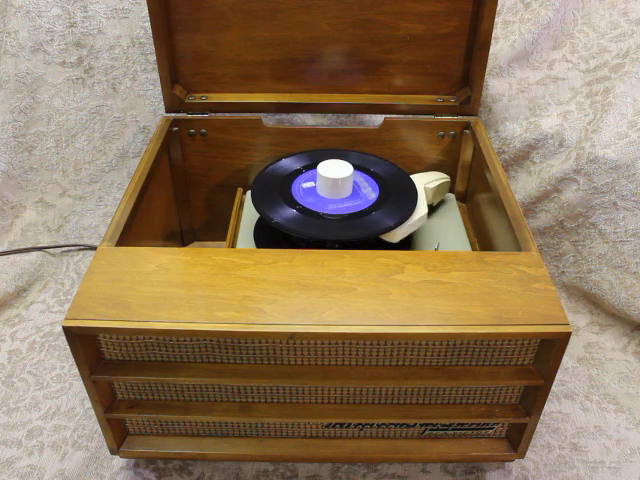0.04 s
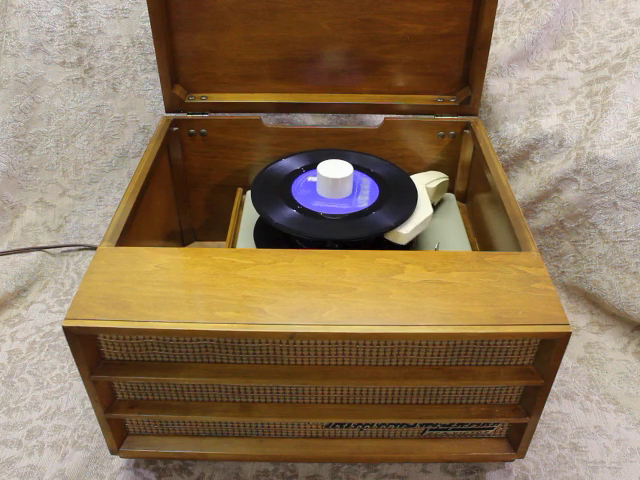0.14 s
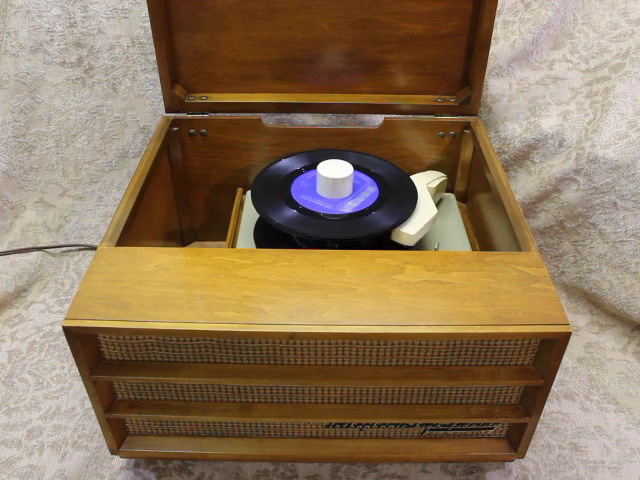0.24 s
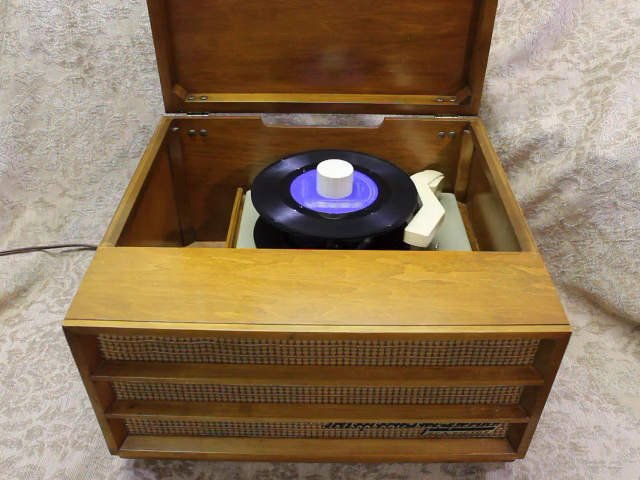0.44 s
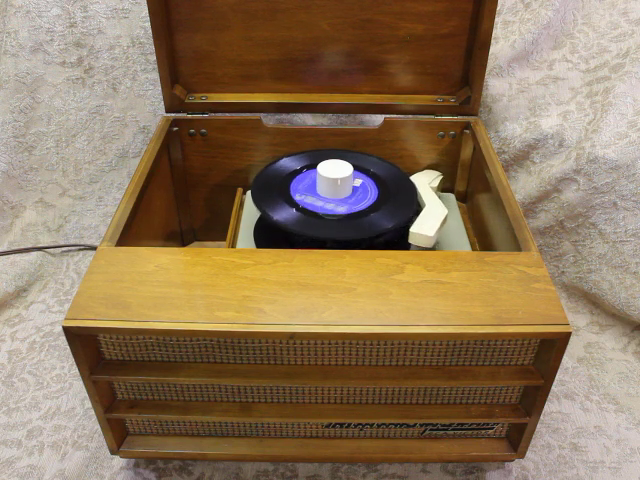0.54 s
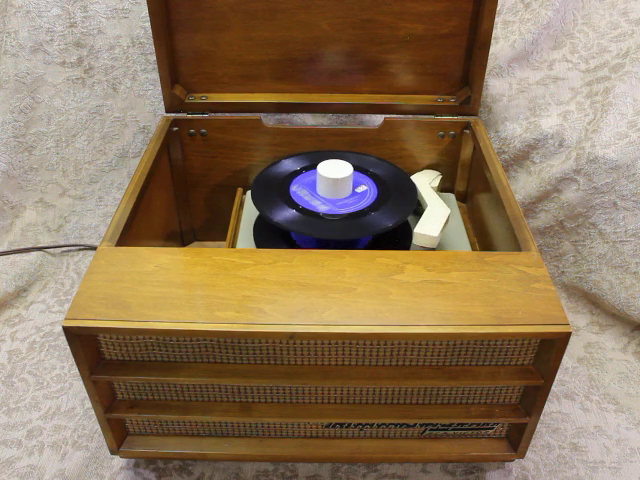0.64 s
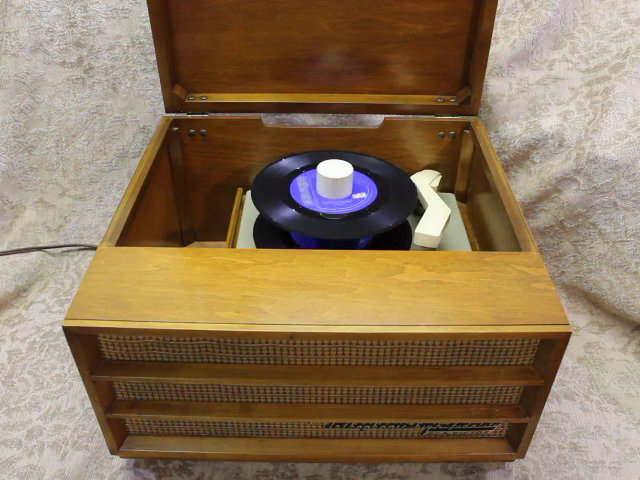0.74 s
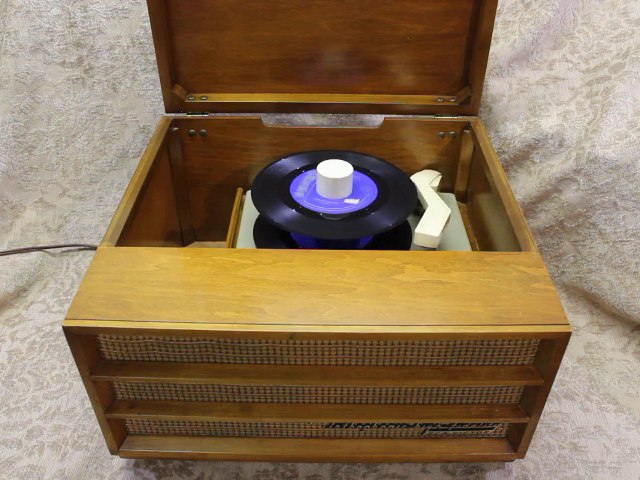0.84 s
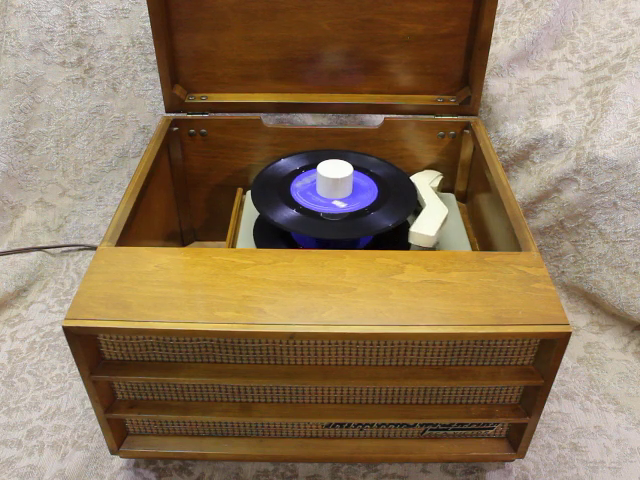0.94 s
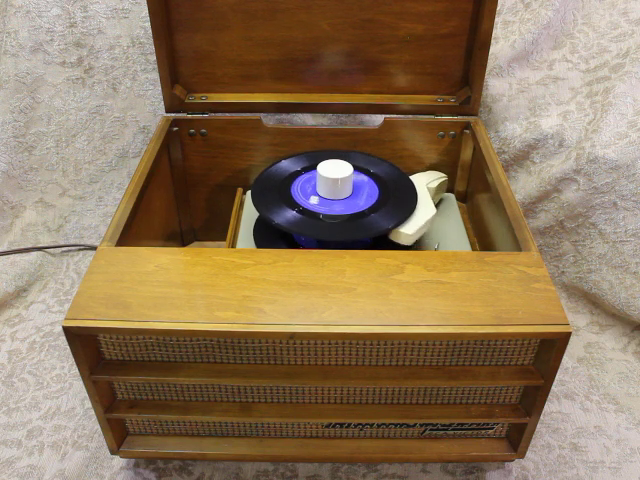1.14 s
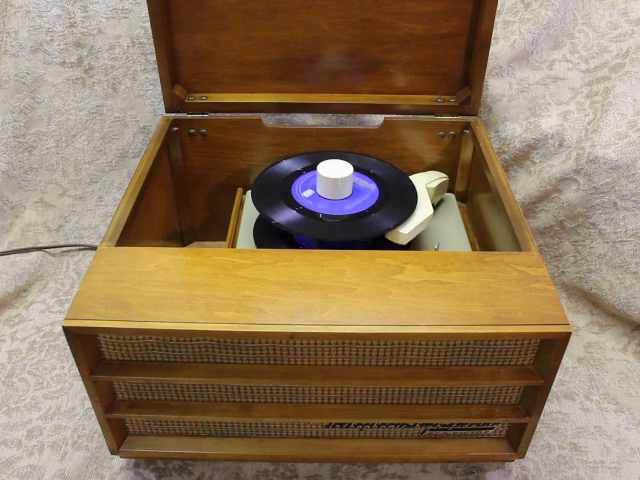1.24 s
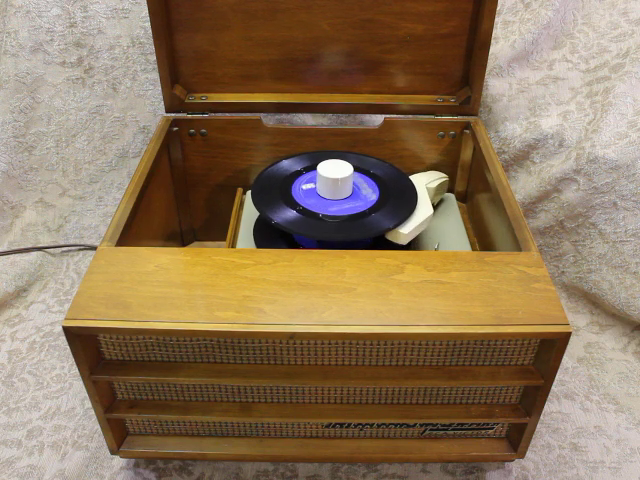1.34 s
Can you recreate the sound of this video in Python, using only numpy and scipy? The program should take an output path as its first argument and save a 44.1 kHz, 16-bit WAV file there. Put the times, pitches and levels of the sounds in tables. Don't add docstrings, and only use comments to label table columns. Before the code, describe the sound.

Record changer mechanism clacking: latch snap, lever knocks, record slap, spring crack, arm settling, low hum

```python
import sys
import numpy as np
from scipy import signal
from scipy.io import wavfile
from scipy.ndimage import uniform_filter1d

SR = 44100
rng = np.random.default_rng(int(sys.argv[2]) if len(sys.argv) > 2 else 0)


def store_wav(level_fs):
    pcm = np.round(np.clip(np.atleast_2d(level_fs), -1, 1) * 32767)
    wavfile.write(sys.argv[1], SR, pcm.T.astype(np.int16))


def invert_db(level):
    return 10 ** (np.asarray(level, dtype=float) / 20)


N = 61739

# pitch in Hz, level in dB rms, width of its wavering in Hz.
MOTOR_WHINE = [(60.4, -69.5, 7.4), (123, -61.5, 11.6), (297, -63.5, 13), (442, -69, 25), (640, -61.5, 90),
               (2116, -64.5, 6.7), (2566, -65, 5)]
# pitch in Hz, level in dB rms.
MAINS_HUM = [(60.5, -65), (119.5, -60)]
# frequency in Hz, level in dB.
HISS_COLOUR = [(25, -24), (90, -11), (220, -3), (300, -6), (1740, -13.5), (2550, -13.5), (9320, -25),
               (16000, -42)]

# start in seconds, peak level in dB, contact time in seconds,
# brightness in dB per octave.
CABINET_HITS = [(0.21, -31, 0.0072, -0.5), (0.40, -43, 0.005, 11.5), (0.434, -28, 0.0049, 7),
                (0.578, -41, 0.0045, 8.5), (0.693, -28, 0.007, -1), (0.74, -41, 0.0039, 5.5),
                (0.31, -45, 0.01, 6.5), (0.98, -38.5, 0.018, 7.5), (0.92, -35, 0.0057, 6.5),
                (1.028, -31, 0.015, -0.5), (1.083, -25.5, 0.0082, 3), (1.135, -31.5, 0.011, -3.5),
                (1.2, -35.5, 0.011, 2), (1.254, -35, 0.0044, 3.5)]
TICK_HITS = [
    (0.398, -34, 0.0031, 1.5),
    (0.4025, -34.5, 0.002, 3.5),
    (0.4187, -31.5, 0.002, 3),
    (0.423, -37, 0.0024, -0.5),
    (0.5645, -28.5, 0.0011, 5),
    (1.034, -44, 0.0027, 0.1),
    (1.220, -48, 0.0014, 0.1),
    (1.2485, -30, 0.0012, 2),
    (1.027, -38.5, 0.0029, -2.5),
]
ARM_HITS = [
    (1.057, -34, 0.0054, 0.092),
    (1.067, -30, 0.009, 0.1),
    (1.1032, -13.5, 0.0024, 0.19),
    (1.181, -41, 0.0028, 0.087),
]
PLATE_HITS = [
    (0.431, -12, 0.0056, 0.1),
    (0.608, -4.5, 0.0072, 0.1),
    (0.9205, -21.5, 0.0034, 0.1),
    (1.059, -36, 0.0044, .1),
    (1.0795, -11.5, 0.0045, 0.1),
]
PAWL_HITS = [
    (0.4295, -11.5, 0.0034, -1.5),
    (0.918, -25.5, 0.0018, 0),
    (1.0765, -12, 0.003, 3.5),
]
LATCH_HITS = [
    (0.2062, -8, 0.0022, 0.13),
]
LEVER_HITS = [
    (0.4293, -6, 0.0042, -1.9),
    (0.9175, -11.5, 0.0046, 1),
    (1.0762, -7.5, 0.0033, -0.9),
    (0.434, -32, 0.0037, -6),
    (1.081, -23, 0.0042, 1),
    (1.2515, -30.5, .003, 0),
]
SPRING_HITS = [
    (0.6907, -3.5, 0.00074, 1.2),
    (0.6935, -12, 0.002, 0.29),
    (0.6965, -12, 0.002, 0.1),
    (0.7002, -12.5, 0.0015, -0.62),
    (0.709, -26, 0.0018, -1.1),
    (0.733, -32, 0.0036, 0.1),
    (0.7415, -25, 0.003, 0.1),
]
RECORD_HITS = [
    (0.592, -28, 0.003, -10),
    (0.6045, -0.5, 0.0052, -3),
    (0.609, -14.5, 0.005, 7),
    (0.6195, -13.5, 0.0027, 0.3),
    (0.661, -30, 0.007, 1.5),
]

# pitch in Hz, level in dB, time to fade by 60 dB in seconds.
CABINET_TONES = [(60.3, -14.5, 0.17), (134, -3.5, 0.101), (232, -5, 0.12), (284.9, 0, 0.13),
                 (370, -4, 0.098), (433.2, 0, 0.09), (569, 6.5, 0.067), (617.3, 7, 0.076), (796, -3, 0.078),
                 (915, -1, 0.055)]
ARM_TONES = [(3960, -3, 0.063), (4230, -5.5, 0.065), (7000, -1, 0.056), (7800, -12, 0.038), (9300, 2, 0.02),
             (11800, -8, 0.05)]
PLATE_TONES = [(4216, 1, 0.055), (4100, -7, 0.036), (4500, -18, 0.048)]
PAWL_TONES = [(807, -7.5, 0.099), (2744, 2, 0.035), (2835, -1, 0.06), (3000, -14, 0.088)]
LATCH_TONES = [(1018, -17, 0.092), (1775, -14.5, 0.079), (4276, 1.5, 0.031), (5130, -9, 0.081),
               (6030, 2.5, 0.033), (7150, -11, .05), (8780, -13, 0.12), (10920, 12, 0.011),
               (10940, -13, 0.18)]
LEVER_TONES = [(671, -18.5, 0.07), (771, -17, 0.07), (903, -16, 0.047), (1168, -19, 0.1),
               (1305, -15.5, 0.069), (1806, -9, 0.032), (1964, 2.5, 0.042), (2257, -12.5, 0.061),
               (3683, -10, 0.033), (5290, -13.5, 0.031), (5520, -15, 0.032), (6710, -24, .06),
               (8860, -20, 0.035)]
SPRING_TONES = [(558, -8.5, 0.053), (780, -20, 0.03), (1180, -6, .24), (1960, -4, 0.056), (2390, -9.5, .08),
                (2692, -3.5, 0.08), (2830, -8, .06), (2990, -5, 0.13), (3320, 3, 0.066), (3890, -6, 0.08),
                (4050, -1, 0.039), (4840, -8, .1), (5450, -7, .05)]
RECORD_TONES = [(700, -24, 0.15), (983, -19.5, 0.094), (1067, -9.5, 0.066), (1416, -24, 0.12),
                (1905, -12, 0.053), (1980, -2, 0.096), (2049, -9.5, 0.098), (2103, -9, 0.1),
                (2179, 5.5, 0.044), (3220, -14, 0.066), (3800, -17, 0.053), (6326, -16, 0.068),
                (6550, -9, 0.043), (9100, -18, 0.042)]

# frequency in Hz, level in dB per Hz.
TICK_CRACK = [(180, -33), (300, 7), (2070, 3), (5520, -4.5), (6740, 1.5), (10700, -19), (16000, -48)]
ARM_CRACK = [(880, -29), (1500, 4), (2060, -3.5), (3310, -10), (8320, -0.5), (11900, -6), (16000, -33)]
LATCH_CRACK = [(180, -40), (300, -7), (1250, -18), (1780, -8), (2700, -13), (3640, -2), (11100, -3),
               (16000, -25)]
LEVER_CRACK = [(300, -8), (1000, 5), (3000, 1.5), (6000, 8), (10000, -4.5), (16000, -47)]
SPRING_CRACK = [(180, -33), (300, -23), (915, -8), (1150, -12), (2140, -8.5), (3350, 0), (9550, -12.5),
                (16000, -34)]
RECORD_CRACK = [(300, -14), (1000, -7.5), (2500, -5.5), (6000, -2), (10000, -9.5), (16000, -62)]

# ring in dB, its echoes in dB, crack in dB, crack fade time in seconds,
# rattle and room in dB, their fade time in seconds.
ARM_MIX = (-9, -5.5, -7, 0.0745, -19.5, 0.35)
LATCH_MIX = (-6, -14.5, -8.5, 0.08, -22.5, 0.42)
LEVER_MIX = (-2, -13.5, -18.5, 0.0672, -28.5, 0.43)
SPRING_MIX = (-13.5, -14, -5, 0.0259, -25.5, 0.3028)
RECORD_MIX = (-0.5, -16.5, -21.5, 0.01, -29, 0.14)
# crack in dB, its fade time in seconds, tail in dB, its fade time in seconds.
TICK_MIX = (-5, 0.08, -13.5, 0.34)
# ring in dB, its echoes in dB.
PLATE_MIX = (-1.6, -13)
PAWL_MIX = (-1.7, -15)

HISS_DB = -53
MODE_SPREAD_DB, PHASE_SPREAD_TURNS = 1.5, 0.08
TREBLE_DIES_FASTER = 0.73
GRAIN_DB, GRAINS_PER_S = 3.5, 1100
ECHO_T60_S, ECHO_BRIGHT_T60_S = 0.24, 0.13
ECHO_SPLIT_HZ, ECHO_GAP_S = 3800, 0.004
FLUTTER_PER_S, FLUTTER_SHARE = 140, 0.7
DUCK_ABOVE_DB, DUCK_SHARE, RECOVER_DB_PER_S = -24.5, 0.094, 3
MIC_DULL_HZ, CUTOFF_HZ = 13000, 16100


def rms_one(x):
    return x / np.sqrt(np.mean(x ** 2) + 1e-20)


def low_pass(x, order, hz):
    return signal.sosfilt(signal.butter(order, hz, fs=SR, output="sos"), x)


def noise_bands(colour):
    hz, db = np.transpose(colour)
    edges = 25 * 2 ** np.arange(0, 9.6, 0.5)
    white = rng.standard_normal((2, N))
    centres = np.sqrt(edges[1:] * edges[:-1])
    gains = invert_db(np.interp(np.log(centres), np.log(hz), db, left=-90))
    out = []
    for k, gain in enumerate(gains):
        band = signal.butter(2, edges[k:k + 2], "band", fs=SR, output="sos")
        out.append(gain * signal.sosfilt(band, white[k % 2]))
    out = np.array(out)
    return centres, out / np.std(out.sum(0))


def resonate(x, hz, t60):
    r, w = invert_db(-60 / (t60 * SR)), 2 * np.pi * hz / SR
    return signal.lfilter([0, np.sin(w)], [1, -2 * r * np.cos(w), r * r], x + 1e-18)


def motor():
    out = invert_db(HISS_DB) * noise_bands(HISS_COLOUR)[1].sum(0)
    for hz, db in MAINS_HUM:
        out += invert_db(db) * rms_one(np.sin(2 * np.pi * hz * np.arange(N) / SR))
    for hz, db, width_hz in MOTOR_WHINE:
        t60 = np.log(1000) / (np.pi * width_hz)
        whine = resonate(rng.standard_normal(N + SR), hz, t60)[SR:]
        out += invert_db(db) * rms_one(whine)
    return out


def echoes(x, level_db):
    age, white = np.arange(SR // 2) / SR, rng.standard_normal(SR // 2)
    dull = low_pass(white, 2, ECHO_SPLIT_HZ)
    tail = dull * invert_db(-60 * age / ECHO_T60_S) + (white - dull) * invert_db(-60 * age / ECHO_BRIGHT_T60_S)
    tail = tail * np.minimum(age / ECHO_GAP_S, 1)
    loose = np.interp(np.arange(N) / SR * FLUTTER_PER_S, np.arange(len(white)), white)
    flutter = rms_one(1 - FLUTTER_SHARE + FLUTTER_SHARE * loose)
    return x + invert_db(level_db) * flutter * signal.fftconvolve(x, tail / np.linalg.norm(tail))[:N]


def ringing(hits, tones):
    out, middle_hz = np.zeros(N), np.median([tone[0] for tone in tones])
    chance = rng.standard_normal((len(hits), len(tones), 2))
    for (start, db, contact, tilt_db), draws in zip(hits, chance):
        i = int(start * SR)
        age = np.arange(min(N - i, SR // 2)) / SR
        push = np.sin(0.5 * np.pi * np.clip(age / max(contact, 5e-4), 0, 1)) ** 2
        for (hz, tone_db, t60), (spread, turn) in zip(tones, draws):
            level = db + tone_db + tilt_db * np.log2(hz / middle_hz) + MODE_SPREAD_DB * spread
            tone = np.sin(2 * np.pi * (hz * age + PHASE_SPREAD_TURNS * turn))
            out[i:i + len(age)] += push * invert_db(level - 60 * age / t60) * tone
    return out


def grain():
    steps = rng.standard_normal(4000)
    ragged = np.interp(np.arange(N) / SR * GRAINS_PER_S, np.arange(len(steps)), steps)
    return rms_one(invert_db(GRAIN_DB * ragged))


def crack(hits, colour, crack_db, crack_t60, tail_db, tail_t60):
    out, t = np.zeros(N), np.arange(N) / SR
    for hz, noise in zip(*noise_bands(colour)):
        if hz < 250:
            continue
        haste = max(hz / 3000, 1) ** TREBLE_DIES_FASTER
        for start, db, contact, tilt_db in hits:
            i, contact = int(start * SR), max(contact, 5e-4)
            age = t[:min(N - i, SR // 2)]
            late = np.maximum(age - 0.98 * contact, 0) * haste
            fade = invert_db(crack_db - 60 * late / crack_t60) + invert_db(tail_db - 60 * late / tail_t60)
            rise = np.minimum(age / (0.38 * contact), 1)
            level = invert_db(db + tilt_db * np.log2(hz / 3000))
            out[i:i + len(age)] += level * rise * fade * noise[i:i + len(age)]
    return out * grain()


def ringing_part(hits, tones, ring_db, echo_db):
    return invert_db(ring_db) * echoes(ringing(hits, tones), echo_db)


def struck_part(hits, tones, colour, mix):
    return ringing_part(hits, tones, *mix[:2]) + crack(hits, colour, *mix[2:])


def cabinet():
    return ringing_part(CABINET_HITS, CABINET_TONES, -6, -3.5)


def ticks():
    return crack(TICK_HITS, TICK_CRACK, *TICK_MIX)


def arm():
    return struck_part(ARM_HITS, ARM_TONES, ARM_CRACK, ARM_MIX)


def plate():
    return ringing_part(PLATE_HITS, PLATE_TONES, *PLATE_MIX)


def pawl():
    return ringing_part(PAWL_HITS, PAWL_TONES, *PAWL_MIX)


def latch():
    return struck_part(LATCH_HITS, LATCH_TONES, LATCH_CRACK, LATCH_MIX)


def levers():
    return struck_part(LEVER_HITS, LEVER_TONES, LEVER_CRACK, LEVER_MIX)


def spring():
    return struck_part(SPRING_HITS, SPRING_TONES, SPRING_CRACK, SPRING_MIX)


def record_drop():
    return struck_part(RECORD_HITS, RECORD_TONES, RECORD_CRACK, RECORD_MIX)


def scene():
    background = motor() + cabinet() + ticks()
    small_parts = arm() + plate() + pawl()
    big_parts = latch() + levers() + spring() + record_drop()
    return (background + small_parts + big_parts)[None]


def top_cut(x):
    return signal.sosfilt(signal.butter(12, 16150, fs=SR, output="sos"), x)


def record(dry):
    ramp = RECOVER_DB_PER_S * np.arange(N) / SR
    level = 10 * np.log10(uniform_filter1d(dry[0] ** 2, size=441) + 1e-12)
    wanted = DUCK_SHARE * np.maximum(level - DUCK_ABOVE_DB, 0)
    duck = np.maximum.accumulate(wanted + ramp) - ramp
    x = low_pass(dry, 2, MIC_DULL_HZ)
    x = np.clip(x * invert_db(-duck), -1, 1)
    x = signal.sosfilt(signal.cheby2(12, 70, CUTOFF_HZ, fs=SR, output="sos"), x)
    return top_cut(x)


dry = scene()
out = record(dry)
store_wav(out)
```